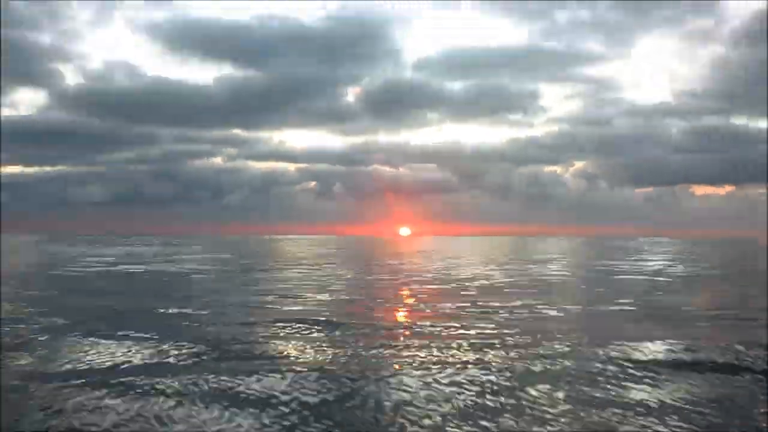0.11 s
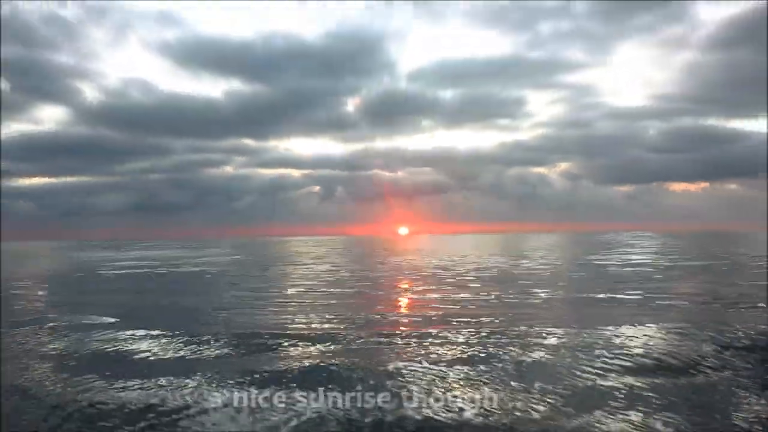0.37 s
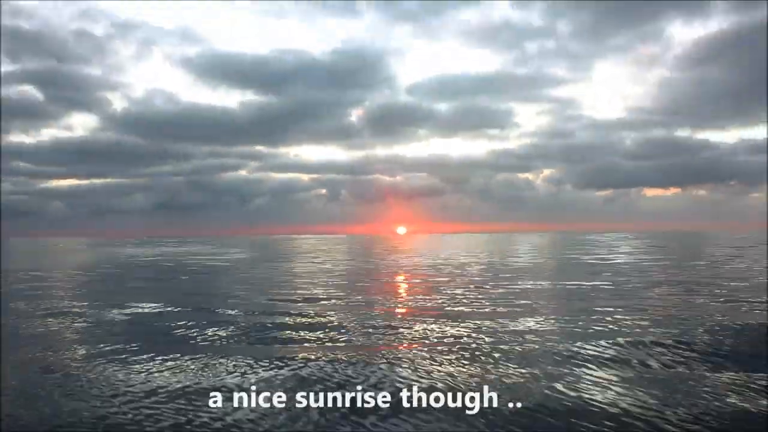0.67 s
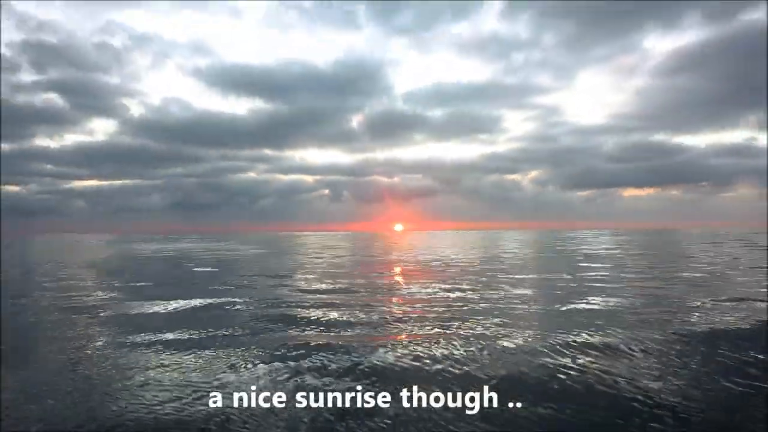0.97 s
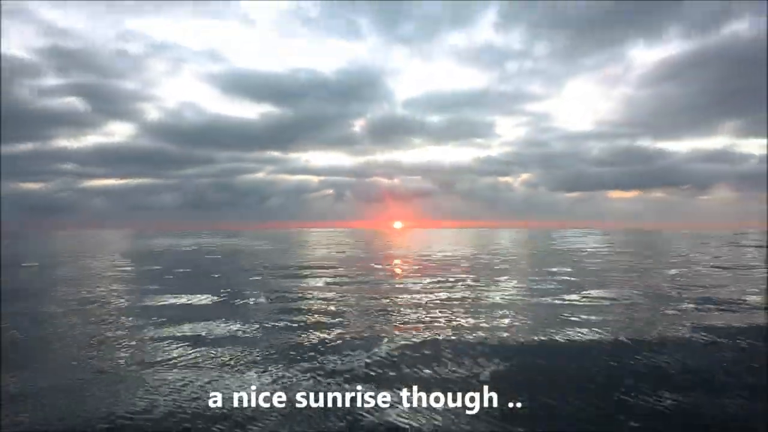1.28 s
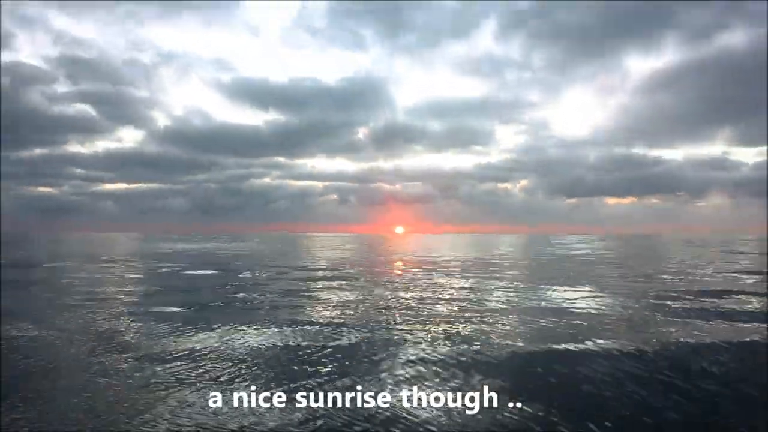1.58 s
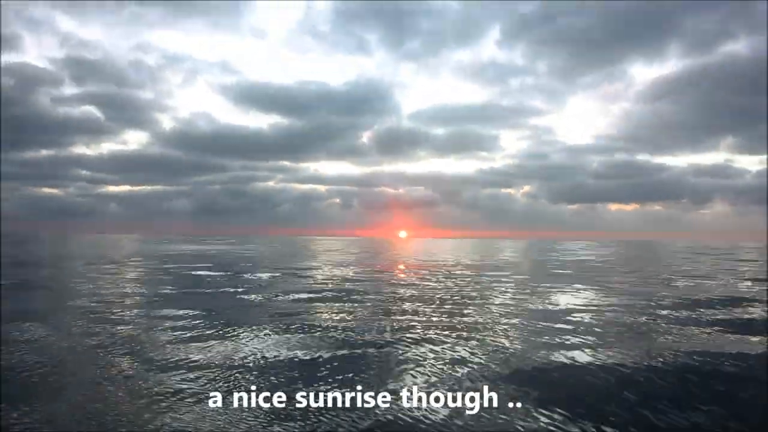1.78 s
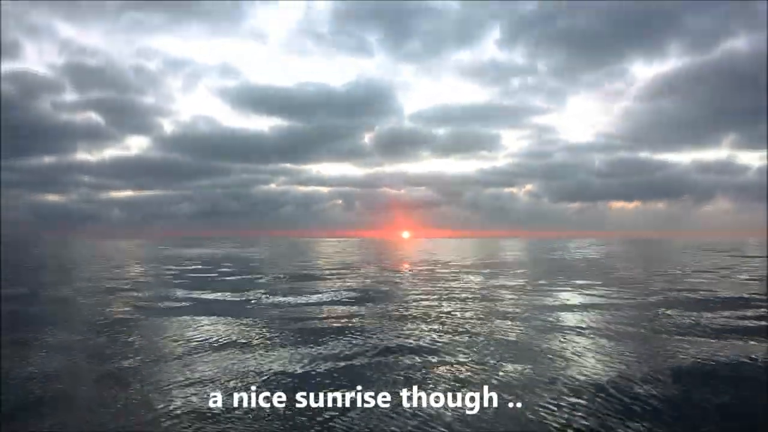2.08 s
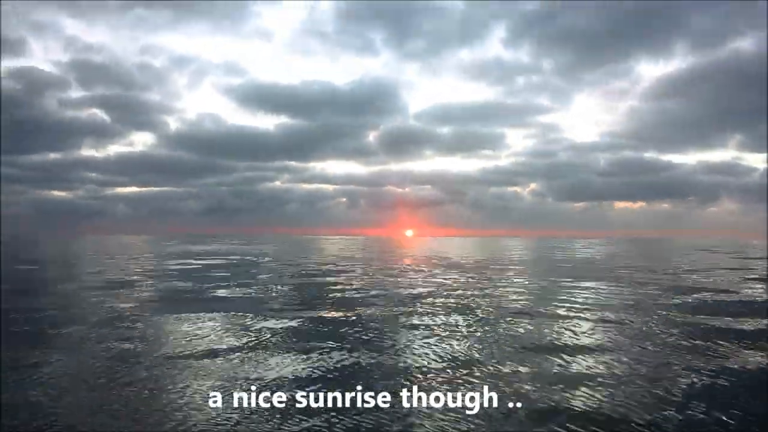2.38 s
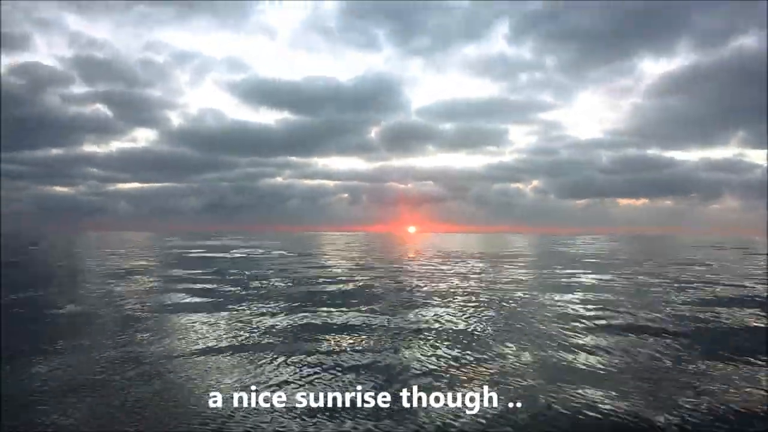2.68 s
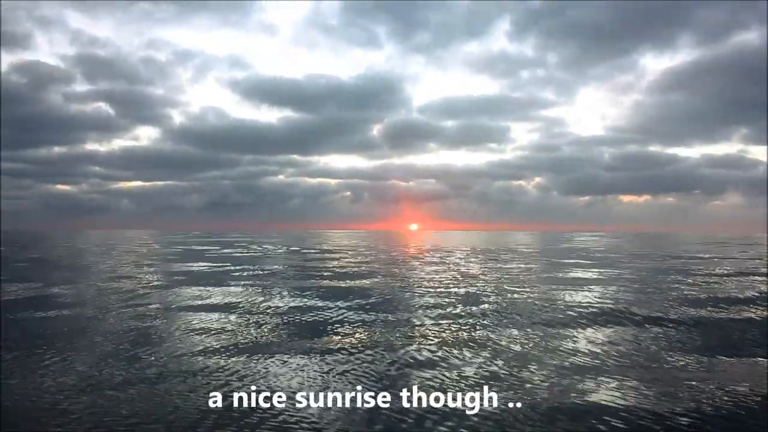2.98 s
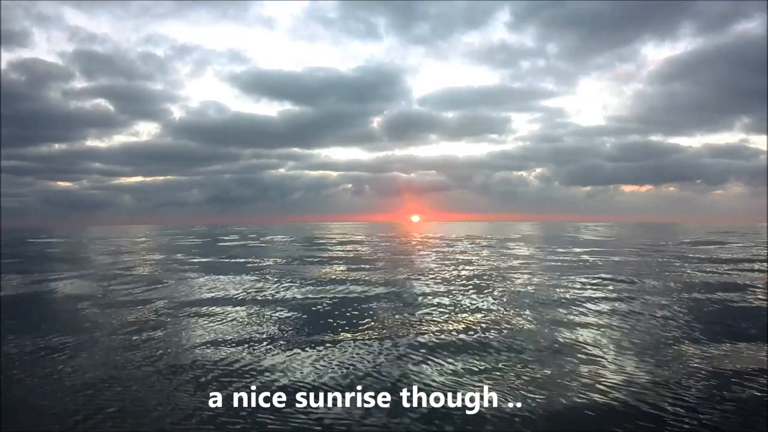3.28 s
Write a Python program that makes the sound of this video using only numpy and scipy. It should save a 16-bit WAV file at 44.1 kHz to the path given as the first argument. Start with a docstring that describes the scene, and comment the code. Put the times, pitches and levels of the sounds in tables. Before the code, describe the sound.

A ratchet block buzzes in two rope pulls, with clacks and knocks around them at sea.

```python
"""A sheet (the rope that holds a sail) runs through a ratchet block in two pulls, its pawls buzzing.
Each drop of a pawl is a tick of coloured noise that rings in the axle and shakes the block.
Around the pulls the rope snatches at its fittings: short noise bursts clack, click, knock and rattle.
The slack sail of a boat rolling in a calm pushes soft, low puffs of air over the two microphones.
The cockpit answers with a short echo tail, and the sea is a faint wash of noise."""
import sys
import numpy as np
from scipy import signal
from scipy.fft import rfft, irfft, next_fast_len
from scipy.io import wavfile
from scipy.ndimage import uniform_filter1d, map_coordinates

SR = 44100
rng = np.random.default_rng(int(sys.argv[2]) if len(sys.argv) > 2 else 0)


def log_audio(samples):
    """Write samples as a 16-bit WAV file to the path given in sys.argv[1]."""
    # one column per channel
    frames = np.atleast_2d(samples).T
    # limit to full scale, then quantise
    limited = np.clip(frames, -1, 1)
    pcm = np.round(limited * 32767).astype(np.int16)
    wavfile.write(sys.argv[1], SR, pcm)


N = 149940  # length in samples
TIME = np.arange(N) / SR  # seconds
# opposite halves: a left-minus-right difference is shared between the two sides
SIDES = np.array([[.5], [-.5]])

# In every table ending in COLOUR, level_db is the relative strength of the noise at pitch_hz.
# Other levels are set before any trim in dB that the function adds.


def amp(db):
    """Turn decibels into a plain multiplier."""
    return 10 ** (np.asarray(db) / 20)


def unit(x):
    """Scale a sound to an rms level of 1."""
    return x / np.sqrt(np.mean(x ** 2) + 1e-20)


def along(points, hz):
    """Read a (pitch_hz, value) table at any pitch, along a logarithmic pitch axis."""
    pitch_hz, value = np.transpose(points)
    return np.interp(np.log(hz + 1), np.log(pitch_hz + 1), value)


def curves(rows):
    """Draw a line through each column after the time, one value per sample."""
    start_s, *columns = np.transpose(rows)
    return [np.interp(TIME, start_s, column) for column in columns]


def filtered(x, response):
    """Multiply the spectrum of a sound by a response that depends on frequency."""
    length = next_fast_len(N + SR // 2)
    hz = np.fft.rfftfreq(length, 1 / SR)
    return irfft(rfft(x, length) * response(hz), length)[..., :N]


# How alike the two sides are. Columns: pitch_hz [Hz], likeness [0 to 1]
STEREO_LIKENESS = [(130, 0.73), (350, 0.96), (1500, 0.83), (3100, 0.89), (7000, 0.41)]


def spread(pair):
    """Mix two unrelated signals into left and right, as alike as the table asks at each pitch."""
    def shares(hz):
        turn = np.arccos(np.clip(along(STEREO_LIKENESS, hz), 0, 1)) / 2
        return np.array([np.cos(turn), np.sin(turn)])
    mid, side = filtered(pair, shares)
    return np.array([mid + side, mid - side])


def noise(colour, shape=lambda hz: 1):
    """Make coloured stereo noise of rms 1."""
    white = rng.standard_normal((2, N))
    return unit(spread(filtered(white, lambda hz: amp(along(colour, hz)) * shape(hz))))


def even(x, size=130):
    """Take the chance swells out of noise, so that like contacts come out alike (size in samples)."""
    power = np.abs(uniform_filter1d(x ** 2, size, axis=-1))
    return unit(x / np.sqrt(power + 1e-9))


def burst(start_s, attack, hold, t60):
    """Rise in a straight line, hold, then die away by 60 dB per t60 (all in seconds)."""
    t = TIME - start_s
    release_s = np.clip(t - attack - hold, 0, 3 * t60)
    return np.clip(t / attack, 0, 1) * amp(-60 * release_s / t60)


def fading_power(t60):
    """Give the power of a ring that dies away by 60 dB per t60 seconds, over a quarter second."""
    return amp(-60 * TIME[:SR // 4] / t60) ** 2


def resonate(x, modes):
    """Let a sound ring a body: each resonance passes a narrow band around its own pitch."""
    def response(f):
        return sum(amp(db) * 1j * f * width / (pitch * pitch - f * f + 1j * f * width)
                   for pitch, width, db in modes)
    return filtered(x, response)


def blows(rows, colour, attack, hold, t60, body_db, treble_db, split_hz):
    """Make each contact a short chatter with its own share of body and treble."""
    def below(hz):
        return 1 / (1 + (hz / split_hz) ** 4)
    low = even(noise(colour, lambda hz: np.sqrt(below(hz))), size=400)
    high = noise(colour, lambda hz: np.sqrt(1 - below(hz)))
    out = np.zeros((2, N))
    for start_s, treble, body in rows:
        chatter = amp(body + body_db) * low + amp(treble + treble_db) * high
        out += burst(start_s, attack, hold, t60) * chatter
    return out


# Level of the sea over time. Columns: start_s [s], level_db [dB]
SEA_LEVEL = [(0, -52.5), (2.4, -55.5), (3.1, -57), (3.3, -60.5), (3.4, -62)]
# Colour of the water. Columns: pitch_hz [Hz], level_db [dB]
SEA_COLOUR = [(50, -35), (110, -2), (370, -2), (1840, -12), (5200, -15.5), (7200, -11), (9900, -23.5),
              (12500, -29), (15500, -67)]


def sea():
    """Faint water along the hull: coloured noise that trembles in level."""
    sea_db, = curves(SEA_LEVEL)
    ripple_db = 2 * map_coordinates(rng.standard_normal(400), [TIME * 45])  # 45 random points a second
    return amp(sea_db + ripple_db) * noise(SEA_COLOUR)


# How long the cockpit rings. Columns: pitch_hz [Hz], t60_s [s to fall by 60 dB]
COCKPIT_DECAY = [(200, 0.37), (1500, 0.23), (7000, 0.11), (14000, 0.047)]


def cockpit(x):
    """A short diffuse answer: fading noise, with a new tail for each twelfth of the sound."""
    out = np.zeros((2, N))
    for part in np.array_split(np.arange(N), 12):
        hz, t, grains = signal.stft(rng.standard_normal((2, SR // 3)), SR, nperseg=256)
        fade = amp(-60 * t / along(COCKPIT_DECAY, hz)[:, None])
        build_up = 1 - np.exp(-t / 0.00087)
        tail = signal.istft(grains * fade * build_up, SR, nperseg=256)[1]
        tail = tail / np.linalg.norm(tail[0])
        wet = signal.fftconvolve(x[:, part], tail, axes=1)[:, :N - part[0]]
        out[:, part[0]:part[0] + wet.shape[1]] += wet
    return spread(out)


PUFF_CYCLES = .7  # half-width of a puff, in cycles of its pitch


def puff(start_s, pitch_hz):
    """One push and pull of air under a bell-shaped swell, a little different at each microphone."""
    cycles = pitch_hz * (TIME - start_s)
    phase = rng.random() + 0.3 * rng.standard_normal((2, 1))
    return np.exp(-(cycles / PUFF_CYCLES) ** 2) * np.sin(2 * np.pi * (cycles + phase))


REBOUND_MIN_S, REBOUND_DB = 0.01573, -9.5  # the air falls back after one to two times this wait
# Air fluttering off the sail. Columns: start_s [s], level_db [dB]
FLUTTER_LEVEL = [(0, -67), (.28, -73), (.35, -72), (.45, -67), (.95, -47), (1.05, -44), (1.12, -31),
                 (1.24, -37.5), (1.32, -43), (1.52, -41), (1.76, -41.5), (1.85, -49), (2.12, -41),
                 (2.22, -48), (2.34, -41), (2.45, -48.5), (2.52, -45.5), (2.7, -51), (3.1, -54.5),
                 (3.4, -62.5)]
# Colour of the flutter. Columns: pitch_hz [Hz], level_db [dB]
FLUTTER_COLOUR = [(28, -13.5), (81, 5), (170, -1), (340, -12), (900, -54)]
# Puffs as the cloth fills. Columns: middle_s [s], pitch_hz [Hz], level_db [dB], left_minus_right_db [dB]
SAIL_PUFFS = [(1.219, 183, -25.5, -11), (1.281, 132, -23, -9.5), (1.435, 79, -27, 2), (1.507, 96, -25.5, 5),
              (1.616, 112, -26, 3), (1.759, 123, -25.5, -1), (2, 160, -36.5, -13), (2.335, 150, -30, -1),
              (2.386, 249, -29.5, -2), (2.496, 119, -29.5, -7)]


def sail():
    """Low flutter of air; each fill of the cloth pushes harder on one microphone, then falls back."""
    flutter_db, = curves(FLUTTER_LEVEL)
    out = amp(flutter_db - 1.5) * noise(FLUTTER_COLOUR)
    for middle_s, pitch_hz, level_db, lean_db in SAIL_PUFFS:
        rebound_s = middle_s + REBOUND_MIN_S * (1 + rng.random())
        rebound = puff(rebound_s, pitch_hz * (1 + .5 * rng.random()))
        push = puff(middle_s, pitch_hz) + amp(REBOUND_DB) * rebound
        out += amp(level_db + lean_db * SIDES) * push
    return out


# Dry ticks of small metal parts. Columns: start_s [s], level_db [dB]
METAL_TICKS = [(0.179, -41.5), (0.953, -28.5), (2.2119, -34.5), (2.2145, -24.5)]
# Colour of the ticks. Columns: pitch_hz [Hz], level_db [dB]
TICK_COLOUR = [(300, -37), (2000, -14), (2900, -5), (5000, -10.5), (7700, -9), (10000, -22), (15000, -55)]


def ticks():
    """Small hard contacts near the microphones: tiny noise bursts with no echo."""
    contacts = sum(amp(db) * burst(start_s, 0.00027, 0.00094, 0.0095) for start_s, db in METAL_TICKS)
    return even(noise(TICK_COLOUR), size=40) * contacts


# Fittings snatched by the rope. Columns: start_s [s], treble_db [dB], body_db [dB]
CLACK_TIMES = [(0.2025, -22.5, -33.5), (1.038, -29, -37.5), (1.178, -26.5, -51), (2.1084, -15.5, -30),
               (2.7196, -21, -40), (2.7507, -27.5, -40.5), (2.781, -27, -35.5), (2.884, -19.5, -32),
               (2.9298, -22, -37), (3.1126, -24, -36)]
# Colour of the clacks, rattle and spar blows. Columns: pitch_hz [Hz], level_db [dB]
CLACK_COLOUR = [(90, -19), (170, -4), (900, -1), (2100, -5), (3200, -3), (4200, -6), (5900, -6.5),
                (7270, -1.5), (9540, -18), (12000, -21.5), (15500, -49)]
LEAD_IN_S, LEAD_IN_DB = 0.0036, -8.5  # how early and how loud the lead-in is, against its clack


def clacks():
    """The rope snatches a fitting: a weaker, earlier copy of the same chatter leads into each clack."""
    scrapes = [(start_s - LEAD_IN_S, treble + LEAD_IN_DB, body + LEAD_IN_DB)
               for start_s, treble, body in CLACK_TIMES]
    return blows(list(CLACK_TIMES) + scrapes, CLACK_COLOUR, attack=0.0031, hold=0.0039, t60=0.1,
                 body_db=-4.5, treble_db=-13.0, split_hz=2430)


# Single teeth and shackles clicking. Columns: start_s [s], treble_db [dB], body_db [dB]
CLICK_TIMES = [(0.1545, -34.5, -73), (0.2445, -26.5, -55), (0.2828, -26, -36), (0.3183, -20, -33.5),
               (1.9791, -27.5, -35.5), (2.5073, -25, -43.5), (2.6696, -16.5, -39.5), (2.7905, -24, -46),
               (2.806, -21, -55), (2.831, -22, -38), (2.8518, -16, -38.5), (2.8672, -20, -41),
               (3.0028, -23, -43.5)]
# Colour of the clicks. Columns: pitch_hz [Hz], level_db [dB]
CLICK_COLOUR = [(90, -26), (170, 4.5), (985, 3), (2140, -7), (3410, -5.5), (6000, -12.5), (7270, 2.5),
                (9360, -15.5), (12000, -20), (15500, -36)]


def clicks():
    """Hard metal meets for an instant: a fast start and a quick fade."""
    return blows(CLICK_TIMES, CLICK_COLOUR, attack=0.00077, hold=0.00066, t60=0.021,
                 body_db=1.5, treble_db=-8.5, split_hz=1580)


# Dull knocks of the tackle. Columns: start_s [s], body_db [dB], treble_db [dB]
KNOCK_TIMES = [(1.091, -24.5, -47), (1.127, -14, -32), (1.143, -20.5, -56), (1.245, -19.5, -67),
               (2.24, -33.5, -61), (2.404, -29.5, -46)]
# Colour of the knocks, slaps and shell blows. Columns: pitch_hz [Hz], level_db [dB]
KNOCK_COLOUR = [(70, -48), (130, 2), (493, 2.5), (735, -2.5), (1280, -2), (1700, -10), (5170, -10.5),
                (7260, -2), (10000, -22), (15000, -60)]
# Resonances of the deck. Columns: pitch_hz [Hz], width_hz [Hz], level_db [dB]
DECK_MODES = [(483, 18, -45), (910, 130, -6), (1280, 33, -9)]


def knocks():
    """The tackle hits the deck: a dull chatter that also rings the deck's resonances."""
    rows = [(start_s, treble, body) for start_s, body, treble in KNOCK_TIMES]
    blow = blows(rows, KNOCK_COLOUR, attack=0.001, hold=0.0055, t60=0.073,
                 body_db=-12, treble_db=-8, split_hz=2420)
    return blow + amp(-5.0) * resonate(blow, DECK_MODES)


# The rope cracks taut. Columns: start_s [s], treble_db [dB], body_db [dB]
SLAP_TIMES = [(.952, -27, -22), (1.0895, -36.5, -20.5), (1.1265, -32.5, -19), (1.335, -35.5, -29)]


def slaps():
    """The rope snaps tight: one very short chatter for each slap."""
    return blows(SLAP_TIMES, KNOCK_COLOUR, attack=.0006, hold=.002, t60=.014,
                 body_db=-3, treble_db=-4, split_hz=2500)


# Blows on a block's hollow shell. Columns: start_s [s], level_db [dB]
SHELL_KNOCKS = [(2.085, -34.5), (2.717, -28)]
# Resonances of the shell. Columns: pitch_hz [Hz], width_hz [Hz], level_db [dB]
SHELL_MODES = [(916, 120, 10.5), (1130, 330, -17), (1350, 180, -5), (1900, 34, 9.5)]
# Blows on a wooden-sounding spar. Columns: start_s [s], level_db [dB]
SPAR_KNOCKS = [(0.1998, -32.5), (2.507, -48)]
# Resonances of the spar. Columns: pitch_hz [Hz], width_hz [Hz], level_db [dB]
SPAR_MODES = [(1230, 90, -3), (2240, 31, 1), (3060, 250, -5), (6460, 120, -4.5)]


def hollow_knocks():
    """A block's shell and a spar each ring their few resonances, struck by a short chatter."""
    shell_hits = sum(amp(db) * burst(start_s, 0.0048, 0.0017, 0.11) for start_s, db in SHELL_KNOCKS)
    shell = even(resonate(noise(KNOCK_COLOUR), SHELL_MODES), size=400) * shell_hits
    spar_hits = sum(amp(db) * burst(start_s, 0.00057, 0.007, 0.061) for start_s, db in SPAR_KNOCKS)
    spar = even(resonate(noise(CLACK_COLOUR), SPAR_MODES), size=400) * spar_hits
    return shell + spar


RATTLE_PER_S, RATTLE_SCATTER_DB, RATTLE_T60_S = 170, 14, .010  # contacts a second, spread, fade
# The rope rattling through its fittings. Columns: start_s [s], level_db [dB]
RATTLE_LEVEL = [(2.735, -42), (2.79, -57), (2.85, -43), (2.91, -42), (2.96, -48), (2.99, -46.5),
                (3.014, -46), (3.05, -58)]


def rattle():
    """Loose fittings chatter under the running rope: random small contacts of uneven strength."""
    rattle_db, = curves(RATTLE_LEVEL)
    hits = rng.random(N) < RATTLE_PER_S / SR
    energy = hits * amp(RATTLE_SCATTER_DB * rng.random(N)) ** 2
    ringing = np.abs(signal.fftconvolve(energy, fading_power(RATTLE_T60_S))[:N])
    chatter = unit(np.sqrt(ringing))
    first_s, last_s = RATTLE_LEVEL[0][0], RATTLE_LEVEL[-1][0]
    running = burst(first_s, .005, last_s - first_s, 0.069)
    return amp(rattle_db) * chatter * running * noise(CLACK_COLOUR)


def tackle():
    """All blows of the rope's gear; the cockpit answers the clacks, slaps, clicks and knocks."""
    clack, click, knock, slap = clacks(), clicks(), knocks(), slaps()
    to_cockpit = amp(-10.5) * (clack + slap) + amp(-6.0) * click + amp(-8.0) * knock
    return clack + click + knock + slap + hollow_knocks() + rattle() + cockpit(to_cockpit)


TOOTH_JITTER_S, TOOTH_SCATTER_DB = .0002, 1.5  # unevenness of the teeth in time and strength
PAWL_BOUNCE_S = .0017  # typical wait before the bounce
SECOND_PAWL_LAG = .5  # in teeth


def pawl_drops(spin):
    """Energy of every drop: two pawls fall in turn over the teeth, and each bounces once."""
    speed, second_db = curves(spin)
    teeth = np.cumsum(speed) / SR  # teeth passed so far
    teeth -= np.interp(spin[0][0], TIME, teeth)  # the first tooth is number 0
    drops = np.zeros(N)
    for lag, pawl_db in ((0, np.zeros(N)), (SECOND_PAWL_LAG, second_db)):
        jitter, strength, bounce = rng.standard_normal((80, 3)).T  # room for 80 teeth
        drop_s = np.interp(np.arange(len(jitter)) + lag, teeth, TIME) + TOOTH_JITTER_S * jitter
        size = amp(np.interp(drop_s, TIME, pawl_db) + TOOTH_SCATTER_DB * strength)
        bounce_s = drop_s + PAWL_BOUNCE_S * np.exp(.5 * np.tanh(bounce))
        for when_s in (drop_s, bounce_s):
            drops += np.bincount((when_s * SR).astype(int), size ** 2, N)
    return drops


PAWL_T60_S, AXLE_T60_S, BLOCK_T60_S = .012, .028, 0.24  # time to fall by 60 dB
AXLE_BELOW_HZ = 3400  # the axle rings below this, the pawls tick above it
# Levels in the first and second pull. Columns: start_s [s], pawl_db [dB], block_body_db [dB]
FIRST_PULL = [(.345, -37.5, -40), (.42, -40, -44), (.6, -38, -42), (.78, -38.5, -43), (.945, -35.5, -38.5),
              (.975, -42.5, -55), (1.06, -39, -39), (1.2, -38, -40.5), (1.228, -45.5, -43)]
SECOND_PULL = [(1.418, -39, -35.5), (1.48, -40.5, -47), (1.7, -38.5, -45.5), (1.9, -36.5, -43),
               (2.011, -36.5, -48)]
# Speed of the ratchet in each pull, from its first tooth.
# Columns: start_s [s], speed [teeth per second], second_pawl_against_first_db [dB]
FIRST_SPIN = [(.3465, 40, -12), (.40, 58, -10), (.56, 60, -7), (.70, 58, 0), (.74, 80.5, -2),
              (.94, 80.5, -7), (1.0, 68, -9)]
SECOND_SPIN = [(1.4175, 87, -10), (1.6, 88, -3), (2.01, 86, -5)]
# Colours of the pawls and of the block's body. Columns: pitch_hz [Hz], level_db [dB]
PAWL_COLOUR = [(1000, -12.5), (1500, -6), (1950, -12), (2330, -10), (3340, -10), (4390, -5.5), (5300, -9.5),
               (6500, -4.5), (7300, 2.5), (8200, -5), (9790, -16), (12500, -18.5), (15500, -56)]
BLOCK_COLOUR = [(100, -11), (172, 2.5), (225, -1.5), (352, 0), (415, -3), (480, 4), (560, -3), (670, -0.5),
                (790, -6.5), (970, -0.5), (1900, -24), (4000, -26)]


def ratchet():
    """Each drop of a pawl ticks, rings on in the axle and shakes the block."""
    def axle_share(hz):
        return 1 / (1 + (hz / AXLE_BELOW_HZ) ** 6)

    def ring(drops, t60, running):
        energy = np.abs(signal.fftconvolve(drops, fading_power(t60))[:N])
        return np.sqrt(energy / np.average(energy, weights=running))

    out = np.zeros((2, N))
    for spin, pull in ((FIRST_SPIN, FIRST_PULL), (SECOND_SPIN, SECOND_PULL)):
        first_s, last_s = spin[0][0], pull[-1][0]
        running = burst(first_s, 0.00056, last_s - first_s, 0.072)
        drops = pawl_drops(spin)
        tick = ring(drops, PAWL_T60_S, running) * even(noise(PAWL_COLOUR))
        axle = ring(drops, AXLE_T60_S, running) * even(noise(PAWL_COLOUR))
        tick = filtered(tick, lambda hz: np.sqrt(1 - axle_share(hz)))
        axle = filtered(axle, lambda hz: np.sqrt(axle_share(hz)))
        body = ring(drops, BLOCK_T60_S, running) * noise(BLOCK_COLOUR)
        pawl_db, body_db = curves(pull)
        out += running * (amp(pawl_db - 2) * (tick + axle) + amp(body_db) * body)
    return out


def scene():
    """Add the sea, the sail, the ticks, the tackle and the ratchet with its cockpit answer."""
    block = ratchet()
    return sea() + sail() + ticks() + tackle() + block + amp(-11) * cockpit(block)


LEFT_LAG_S = .00006  # the left side hears this much later than the right
TREBLE_EDGE_HZ, TOP_HZ = 13050, 15600  # steep treble roll-off, then a complete cut
# Balance of the two microphones. Columns: pitch_hz [Hz], left_minus_right_db [dB]
MICROPHONE_BALANCE = [(60, -1.5), (400, -2), (4000, -4), (5660, -9.5), (7830, -15.5), (10800, 9),
                      (15000, 6)]


def record(dry):
    """The two microphones differ in colour and arrival time; the highest treble is removed."""
    def microphones(hz):
        gains = amp(along(MICROPHONE_BALANCE, hz) * SIDES)
        delay = np.exp(-2j * np.pi * hz * LEFT_LAG_S * SIDES)
        return gains / gains.mean(axis=0) * delay

    def band_limit(hz):
        return (hz < TOP_HZ) / np.sqrt(1 + (hz / TREBLE_EDGE_HZ) ** 30)
    return filtered(filtered(dry, microphones), band_limit)


dry = scene()
out = record(dry)
log_audio(out)
```